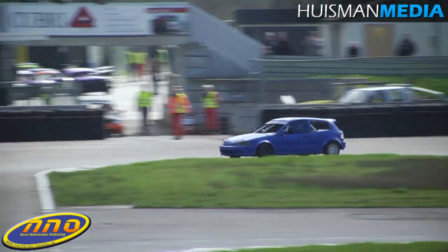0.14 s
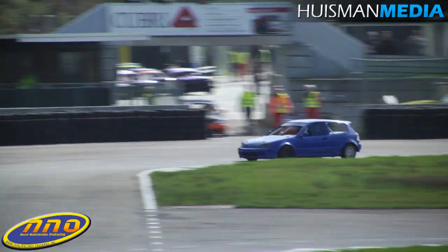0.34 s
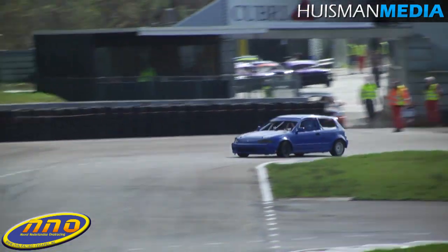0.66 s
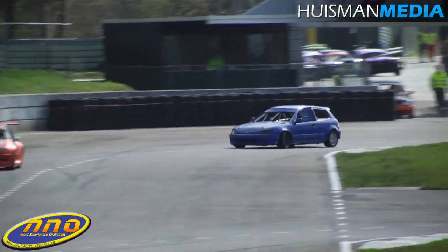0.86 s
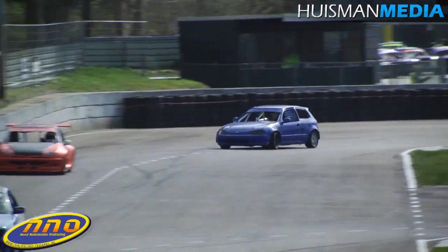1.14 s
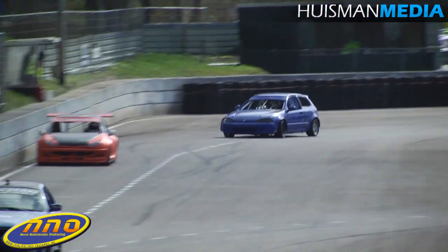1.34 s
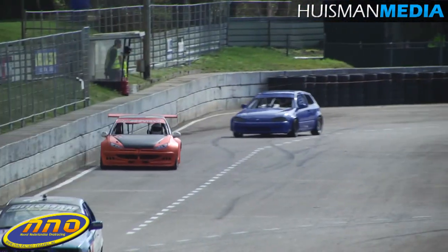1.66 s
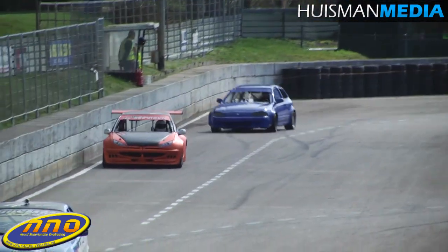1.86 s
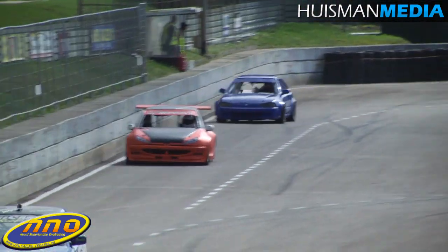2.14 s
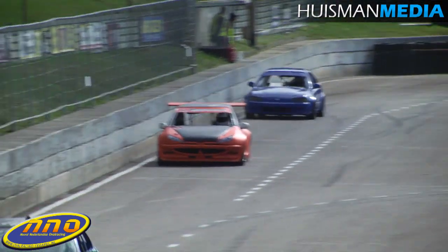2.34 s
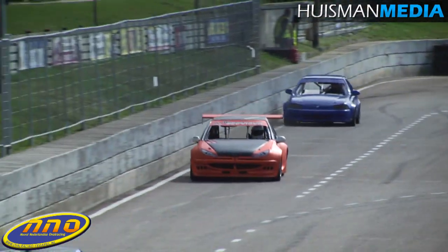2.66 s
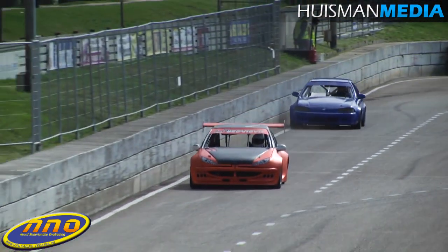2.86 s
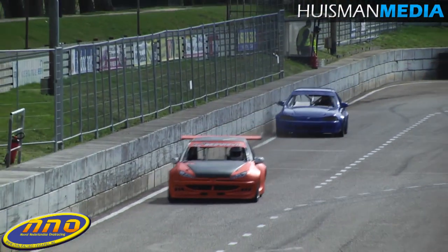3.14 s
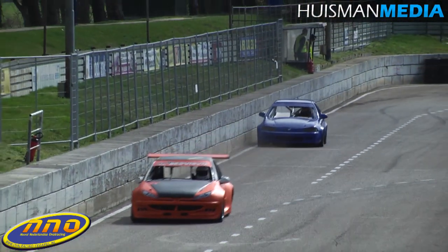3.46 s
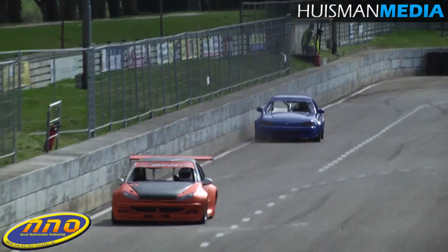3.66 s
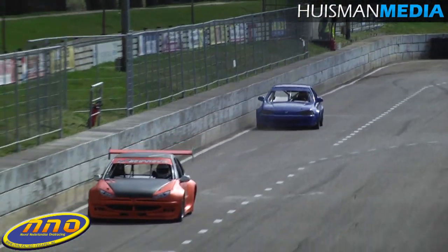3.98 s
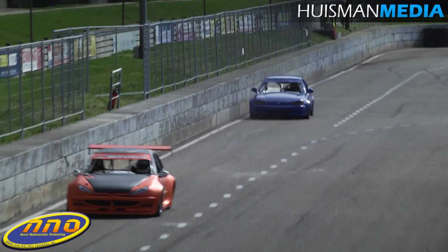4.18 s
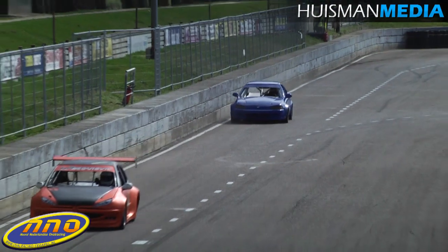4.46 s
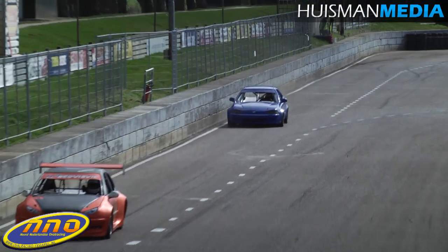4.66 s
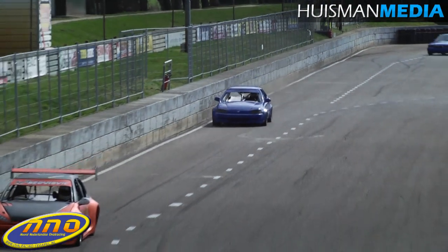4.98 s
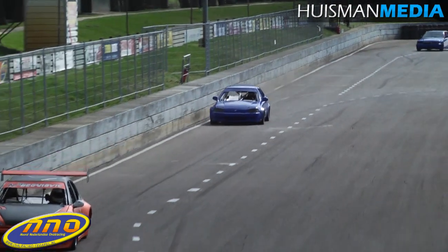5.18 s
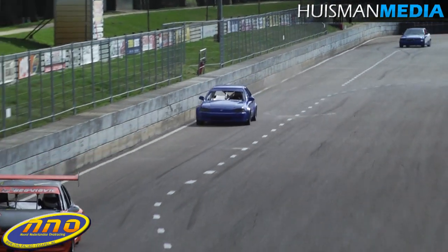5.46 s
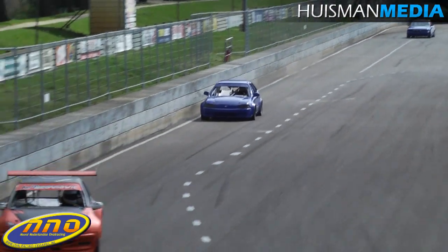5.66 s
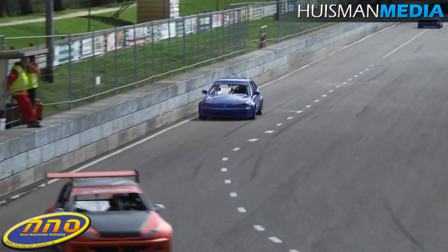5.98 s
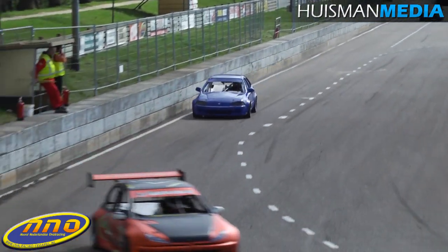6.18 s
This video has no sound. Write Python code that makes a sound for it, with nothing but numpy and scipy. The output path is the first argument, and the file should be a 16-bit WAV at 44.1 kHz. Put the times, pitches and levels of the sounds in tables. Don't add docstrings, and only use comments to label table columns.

```python
import sys
import numpy as np
from scipy import signal
from scipy.fft import rfft, irfft, next_fast_len
from scipy.io import wavfile
from scipy.ndimage import uniform_filter1d, map_coordinates

SR = 44100
rng = np.random.default_rng(int(sys.argv[2]) if len(sys.argv) > 2 else 0)


def linear_from_db(decibels):
    return 10 ** (np.asarray(decibels, float) / 20)


def wav_out(sig):
    wavfile.write(sys.argv[1], SR, np.round(np.clip(np.atleast_2d(sig).T, -1, 1) * 32767).astype(np.int16))


N = 278712

# (time [s], peak level [dB])
CREAKS = [(0.5486, -64), (0.583, -59), (0.9172, -61), (1.161, -68), (2.72, -59)]
# (frequency [Hz], level [dB])
CREAK_SPECTRUM = [(5500, -35), (7000, -1), (9500, 4), (11000, -32)]
# (frequency [Hz], level [dB])
SELF_NOISE_SPECTRUM = [(5000, -62), (7000, -4.5), (11000, 3.5), (15700, -1), (16000, -120)]

# (time [s], weight of traffic [dB], nearness of the closest tyres [dB])
TRAFFIC = [(0, 8.5, -8), (.3, -6, -2), (.5, -4.5, -5), (1.0, 1, -4), (1.4, 3, -0.5), (1.65, 5.5, -3),
           (2.05, 9.5, -0.5), (2.3, 5.5, 0), (2.6, 1, 8), (2.95, 0.5, -1), (3.2, -8, 3.5), (3.37, -1, -0.5),
           (3.5, -13.5, -5), (3.85, -14.5, 0.5), (4.05, -9, 0), (4.25, -12.5, -1.5), (4.65, -7, 3),
           (4.93, 1, 12), (5.3, 13, 9), (5.45, 3, 10.5), (5.85, 6, 12.5), (6.05, -4.5, 8.5)]
NOISE_FOLLOWS = {"rumble": (-39, 0.82, .01), "roar": (-31.5, 0.3, 0.12), "tyres": (-37, 0.2, 0.48),
                 "hiss": (-63, .01, 0.99)}
# (frequency [Hz], level [dB])
RUMBLE_SPECTRUM = [(12, -39.5), (20, -7.5), (92, 7.5), (146, -3.5), (170, -13.5), (220, -25), (370, -120)]
ROAR_SPECTRUM = [(71, -42), (120, -12), (144, -10.5), (259, 1), (350, -4.5), (522, -5), (628, -13),
                 (829, -7), (1400, -29.5), (1820, -51), (3080, -120)]
TYRE_SPECTRUM = [(590, -38.5), (1000, -9.5), (1160, 2.5), (1370, -5), (1530, -3.5), (2640, -6), (3020, -8),
                 (3480, -18), (4520, -39), (7660, -120)]
HISS_SPECTRUM = [(3300, -58), (3900, 0), (4300, -1), (5200, 1.5), (6200, -4), (7000, -14), (9000, -20),
                 (11500, -27.5), (15700, -43), (16000, -120)]
# (frequency [Hz], correlation [-1 to 1])
COHERENCE = [(50, .91), (420, .998), (3350, .93), (4250, -.45), (5500, .84), (6500, .8), (8500, -.1),
             (15000, -.1)]
# (frequency [Hz], left over right [dB])
PORT_BALANCE = [(3700, 0), (4450, 3.5), (5400, 0)]

# (frequency [Hz], t60 [s])
WALL_DECAY = [(100, 1), (500, 1), (2000, 0.47)]
# (time [s], gain [dB])
PATH_NULLS = [(0.436, -15.5), (3.122, -9.5), (3.193, -10), (3.274, -11.5), (3.41, 1), (3.48, 0.5),
              (3.58, -3), (3.683, -3), (3.77, -2), (4.11, -4), (4.207, -19.5), (5.71, -0.5), (5.785, -7),
              (5.965, -9.5), (6.03, -10)]

# (time [s], level [dB])
BACKFIRES = [
    (6.0463, -9.5),
    (6.0822, -8.5),
    (6.085, -8),
]
# (start [s], end [s], first pitch [Hz], last pitch [Hz], level [dB])
TYRE_SLIPS = [(2.65, 2.76, 1165, 1175, -34), (2.761, 2.82, 1120, 1105, -34), (3.065, 3.1, 814, 800, -31),
              (3.101, 3.19, 798, 808, -24), (3.191, 3.26, 842, 785, -22), (3.261, 3.31, 800, 860, -32),
              (3.325, 3.39, 835, 800, -23), (3.391, 3.42, 800, 815, -29), (3.421, 3.48, 815, 812, -35),
              (3.6, 3.86, 865, 888, -38), (3.9, 3.96, 790, 805, -35), (4.02, 4.1, 845, 825, -35)]

# (start [s], end [s], first pitch [Hz], last pitch
# [Hz], level [dB])
ENGINE_WHINES = [(4.82, 5.1, 1960, 1640, -39.5), (4.86, 5.02, 2700, 2580, -43),
                 (4.99, 5.16, 2630, 2420, -39.5), (5.12, 5.28, 2425, 2395, -36.5),
                 (5.03, 5.22, 2420, 2300, -42), (5.17, 5.3, 2310, 2290, -41), (5.27, 5.4, 2290, 2210, -41),
                 (5.48, 5.58, 2120, 2070, -45), (5.28, 5.44, 2700, 2600, -43), (5.0, 5.22, 1870, 1820, -41),
                 (5.03, 5.22, 1480, 1410, -40), (5.15, 5.38, 1550, 1590, -44), (5.24, 5.36, 1700, 1710, -40),
                 (5.52, 5.96, 1890, 2000, -40), (5.52, 5.96, 1077, 1140, -42), (5.52, 5.96, 1606, 1700, -46)]
# (start [s], end [s], first pitch [Hz], last
# pitch [Hz], level [dB])
GAP_CARS = [(.87, 1.0, 296, 262, -29), (.99, 1.42, 256, 267, -26), (1.5, 1.95, 252, 264, -26.5),
            (1.04, 1.42, 206, 194, -25), (.3, .52, 405, 425, -36), (.42, .5, 860, 860, -35),
            (2.62, 2.85, 200, 196, -31), (2.75, 2.92, 410, 410, -33), (2.45, 2.72, 530, 570, -36),
            (1.85, 2.3, 1040, 1075, -40), (5.98, 6.4, 100, 90, -33), (1.92, 2.08, 178, 182, -30),
            (5.55, 5.63, 280, 290, -25), (5.38, 5.56, 210, 255, -26), (1.39, 1.6, 213, 204, -25.5),
            (1.86, 1.98, 1175, 1190, -37), (1.6, 1.8, 198, 180, -27.5), (1.12, 1.48, 133, 140, -33)]

# (time [s], pitch [Hz])
SIX_HIGH_PITCH = [(0.0, 57.9), (0.2, 59.7), (0.36, 60.7), (0.46, 61.5)]
SIX_SHIFT_PITCH = [(.6, 172.2), (.68, 174.6), (.73, 166.3), (.78, 150.7), (.84, 141.6), (.93, 129.8),
                   (1.1, 134.5), (2.22, 153.0), (2.36, 148.4)]
FAR_FOUR_PITCH = [(0, 175.7), (.2, 178.3), (.5, 190.7), (.7, 202.5), (.95, 221.8), (1.45, 239.7)]
LEAVING_PITCH = [(0, 497), (.12, 515)]
CRUISER_PITCH = [(1.62, 287.2), (1.9, 294.0), (2.2, 291.7), (2.3, 294.5), (2.5, 289.0), (2.8, 281.8),
                 (3.05, 283.0)]
LEADER_PULL_PITCH = [(1.6, 200.2), (1.8, 207.7), (2.2, 229.2), (2.4, 235.6), (2.55, 246.3), (3.2, 275.9),
                     (3.8, 296.3), (4.05, 303.1)]
LEADER_COAST_PITCH = [(4.17, 300.7), (4.3, 283.5), (4.4, 284.2), (4.6, 265.0), (5.0, 221.6), (5.1, 204.6),
                      (5.2, 201.7), (5.36, 187.6)]
BRAKER_SLOWS_PITCH = [(2.6, 99.7), (2.8, 101.5), (3.15, 114.1), (3.4, 98.6), (3.95, 74.7), (4.08, 84.6),
                      (4.2, 117.8), (4.9, 56.9), (5.15, 56.0)]
BRAKER_GOES_PITCH = [(5.25, 69.9), (5.35, 99.4), (5.42, 126), (5.5, 160), (5.6, 192.7), (5.68, 193.5),
                     (5.8, 176.4), (5.88, 184), (5.97, 195.0), (6.1, 195.2), (6.32, 177.4)]
CHASER_PITCH = [(4.25, 233.2), (4.6, 245.2), (4.8, 248.2), (5.0, 258.2), (5.5, 267.5), (5.7, 277.2),
                (6.05, 287.7), (6.1, 286), (6.15, 277.0), (6.32, 269)]

# (time [s], leading order level [dB], other orders level [dB])
SIX_HIGH_THROTTLE = [(0, -18, -40), (0.04, -19, -41), (0.08, -15.5, -40), (0.14, -21, -37),
                     (0.2, -22, -34.5), (0.3, -22, -34.5), (0.36, -23, -36), (0.41, -28, -40),
                     (0.44, -44, -50)]
FAR_FOUR_THROTTLE = [(0, -29, -42), (0.121, -27, -46.5), (.43, -26, -42), (.49, -23.5, -37.5),
                     (.62, -22.5, -38.5), (.85, -26.5, -34.5), (.92, -33.5, -34), (1.21, -41.5, -36.5),
                     (1.45, -30.5, -44)]
SIX_CLUTCH_THROTTLE = [(.6, -47.5, -63), (.62, -24.5, -49.5), (.64, -15, -38.5), (.68, -14, -40),
                       (.731, -14.5, -47), (.769, -36.5, -35.5), (.81, -20, -33), (0.851, -22.5, -32),
                       (.88, -39, -33)]
SIX_PULL_THROTTLE = [(.95, -30, -33), (1.05, -30, -31), (1.3, -29, -31), (1.55, -29, -30), (1.75, -33, -31),
                     (2.0, -32, -30), (2.12, -30, -30), (2.22, -32, -32), (2.29, -28, -44),
                     (2.359, -30, -50)]
LEADER_PULL_THROTTLE = [(1.6, -32.5, -46.5), (1.93, -25.5, -35.5), (2.0, -25, -29), (2.07, -26, -36),
                        (2.12, -25, -22), (2.19, -22.5, -24.5), (2.281, -23.5, -32.5), (2.38, -17.5, -29.5),
                        (2.45, -24, -26), (2.519, -15.5, -26.5), (2.62, -15, -33.5), (2.7, -18, -36.5),
                        (2.735, -16.5, -23.5), (2.79, -16.5, -29.5), (2.87, -16, -38), (2.99, -17, -49),
                        (3.07, -14, -47), (3.4, -15.5, -49), (3.6, -13.5, -54), (4.13, -13.5, -54.5)]
LEADER_COAST_THROTTLE = [(4.2, -22.5, -49), (4.25, -19.5, -55), (4.33, -31.5, -48), (4.45, -31.5, -53.5),
                         (4.6, -23.5, -56), (4.65, -34, -47.5), (4.71, -22, -37.5), (4.82, -20.5, -46),
                         (4.9, -23, -38), (4.95, -19.5, -22), (5.05, -21.5, -32), (5.15, -25.5, -31.5),
                         (5.25, -24.5, -29.5), (5.36, -28.5, -37.5)]
BRAKER_SLOWS_THROTTLE = [(2.6, -58.5, -46), (2.72, -41, -47.5), (3.34, -34.5, -44), (3.6, -47.5, -34),
                         (3.841, -41, -53), (4.0, -52.5, -57), (4.21, -33.5, -25.5), (4.71, -36.5, -49.5),
                         (5.2, -44.5, -48.5)]
BRAKER_GOES_THROTTLE = [(5.27, -29, -40), (5.33, -18.5, -21.5), (5.38, -22.5, -22.5), (5.45, -38, -30.5),
                        (5.5, -40, -18.5), (5.55, -21, -23), (5.61, -16.5, -28), (5.69, -23.5, -33.5),
                        (5.75, -24.5, -27.5), (5.85, -34.5, -32.5), (5.9, -20, -38.5), (6.01, -21, -40.5),
                        (6.06, -27.5, -36.5), (6.17, -29.5, -35), (6.32, -30.5, -34)]
CHASER_NEARS_THROTTLE = [(4.25, -37.5, -40.5), (4.561, -29, -35.5), (4.79, -32, -33), (4.861, -42.5, -38.5),
                         (4.94, -29, -33.5), (5.25, -25, -32.5), (5.32, -21, -53.5), (5.4, -47, -53.5)]
CHASER_PULL_THROTTLE = [(5.48, -22, -35), (5.55, -30, -42), (5.71, -18, -45.5), (5.78, -16, -45),
                        (5.94, -17.5, -31.5), (6.01, -15, -50.5), (6.09, -18, -27.5), (6.17, -21.5, -50.5),
                        (6.32, -18.5, -52.5)]

# (time [s], level [dB])
HOWL_LEVEL = [(0, -39), (.07, -38), (.15, -40.5), (.25, -43), (.36, -42.5), (.44, -47)]
BARK_LEVEL = [(.61, -55), (.635, -35), (.68, -35), (.72, -35), (.76, -39), (.79, -55)]
LEAVING_LEVEL = [(0, -30), (.075, -30), (.12, -48)]
CRUISER_LEVEL = [(1.62, -47.5), (1.72, -31), (1.85, -29.5), (1.902, -28.5), (2.0, -18.5), (2.051, -24.5),
                 (2.1, -22.5), (2.16, -22), (2.24, -20.5), (2.299, -22), (2.38, -17.5), (2.46, -21.5),
                 (2.55, -38), (2.7, -26), (3.05, -44)]

# (multiple of pitch [ratio], level [dB])
SIX_HIGH_SERIES = [(4, 2), (7, -4), (9, -5), (12, 0), (13, -2), (14, 2), (15, -2), (16, -3), (18, -8),
                   (20, -10)]
HOWL_SERIES = [(24, -9), (25, -8), (27, -1), (28, -10), (29, -11), (30, -11), (38, -10), (42, -12)]
SIX_SHIFT_SERIES = [(3, 3), (4, 3), (5, 0), (6, 0), (7, -5), (8, -11), (9, -12), (10, -19), (11, -14),
                    (12, -19), (13, -15), (15, -16), (17, -20)]
BARK_SERIES = [(4.7, -4), (5.4, -1)]
FOUR_SERIES = [(.5, -18), (.75, -15), (1.25, -16), (1.5, -19), (1.75, -20), (2, 0), (3, -8)]
LEADER_SERIES = [(.75, -22), (1.25, -21), (1.5, -27), (1.75, -25), (2, 0), (3, -14)]
BRAKER_SERIES = [(.5, -15), (2, 0), (3, -10)]

# (frequency [Hz], level [dB])
TAILPIPE_RESPONSE = [(450, -1), (525, -6), (600, -3), (720, 0), (820, 2.5), (920, -1), (1000, -12),
                     (1080, -8), (1250, -1), (1400, -5), (1520, -1)]
RASP_SPECTRUM = [(400, -26.5), (700, -5), (900, 3), (1200, 2), (2000, -10.5), (3300, -19), (4000, -56.5)]


def unit(x):
    return x / np.sqrt(np.mean(x ** 2) + 1e-20)


def along(points, hz):
    f, value = np.transpose(points)
    return np.interp(np.log(hz + 1), np.log(f + 1), value)


def curves(rows):
    s, *columns = np.transpose(rows)
    span = np.arange(int(s[0] * SR), min(int(s[-1] * SR), N))
    return span, [np.interp(span / SR, s, column) for column in columns]


def wobble(rate, size):
    knots = rng.standard_normal(int(N * rate / SR) + 4)
    return map_coordinates(knots, [np.arange(size) * rate / SR], order=1)


def fade(span, seconds):
    still_sounding = span[-1] > N - SR // 100
    end = span[-1] + (0.01 * SR if still_sounding else 0)
    return np.clip(np.minimum(span - span[0], end - span) / (seconds * SR), 0, 1)


def swell(start, end, first_hz, last_hz, db):
    edge_db = db - 10.5
    full = [(start + share * (end - start), db) for share in (0.25, 0.65)]
    return [(start, first_hz), (end, last_hz)], [(start, edge_db), *full, (end, edge_db)]


def filtered(x, response):
    m = next_fast_len(N + 8192)
    return irfft(rfft(x, m) * response(np.fft.rfftfreq(m, 1 / SR)), m)[..., :N]


def rush(spectrum, patchy_db, gate=1):
    z = signal.stft(rng.standard_normal((2, N + 512)), nperseg=512)[2]
    field = uniform_filter1d(rng.standard_normal(z.shape[1:]), 6, 0)
    field = uniform_filter1d(field, 10, 1)
    pair = gate * signal.istft(z * linear_from_db(patchy_db * unit(field)), nperseg=512)[1][:, :N]

    def response(hz):
        angle = np.arccos(np.clip(along(COHERENCE, hz), -1, 1)) / 2
        return linear_from_db(along(spectrum, hz)) * [np.cos(angle), np.sin(angle)]

    mid, side = filtered(pair, response)
    return unit(np.array([mid + side, mid - side]))


def electronics(cars):
    power = uniform_filter1d(cars[0] ** 2, int(0.4 * SR))
    loud_db = 10 * np.log10(abs(power) + 1e-9)
    return linear_from_db(-81 - 0.5 * (loud_db - loud_db.mean())) * rush(SELF_NOISE_SPECTRUM, patchy_db=1)


def creaks():
    out, t = np.zeros((2, N)), np.arange(SR // 20) / SR
    t60_s = 0.03
    for s, db in CREAKS:
        burst = linear_from_db(db + 3 - 60 * t / t60_s) * rng.standard_normal((2, len(t)))
        out[:, round(s * SR):][:, :len(t)] += burst
    return filtered(out, lambda hz: linear_from_db(along(CREAK_SPECTRUM, hz)))


def track_noise():
    weight, near = [np.pad(c, (0, N - len(c)), "edge") for c in curves(TRAFFIC)[1]]
    levels = [mean_db + a * weight + b * near for mean_db, a, b in NOISE_FOLLOWS.values()]
    rumble_db, roar_db, tyres_db, hiss_db = levels
    surge = wobble(9, N)
    firing = linear_from_db(1.2 * wobble(270, N))
    rumble = linear_from_db(rumble_db + 1.5 * wobble(7, N)) * rush(RUMBLE_SPECTRUM, patchy_db=0.8)
    roar = linear_from_db(roar_db + 5 + 0.5 * surge) * rush(ROAR_SPECTRUM, patchy_db=1, gate=firing)
    tyres = linear_from_db(tyres_db + 0.5 + surge) * rush(TYRE_SPECTRUM, patchy_db=0.5, gate=firing)
    hiss = linear_from_db(hiss_db + 2.5 + 0.6 * surge) * rush(HISS_SPECTRUM, patchy_db=1.5, gate=firing)
    return rumble + roar + tyres + hiss


def walls(x):
    hz, t, z = signal.stft(rng.standard_normal((2, SR)), SR, nperseg=256)
    decay = linear_from_db(-60 * t / along(WALL_DECAY, hz)[:, None])
    mid, side = signal.istft(z * decay, SR, nperseg=256)[1]
    tail = np.array([mid + 0.046 * side, mid - 0.054 * side]) / np.linalg.norm(mid)
    delayed = np.pad(x, (1500, 0))[None]
    return signal.fftconvolve(delayed, tail, axes=1)[:, :N]


def interference():
    t = np.arange(N) / SR
    return linear_from_db(sum(db * np.exp(-((t - s) / 0.016) ** 2) for s, db in PATH_NULLS))


def backfire():
    out, t = np.zeros(N + SR), np.arange(SR // 10) / SR
    pop_s, puff_t60_s, thump_t60_s, thump_hz, top_hz = 0.00043, 0.034, 0.097, 125, 2600
    for s, db in BACKFIRES:
        pop = -(t / pop_s) * (2 - t / pop_s) * np.exp(1 - t / pop_s)
        gas = uniform_filter1d(rng.standard_normal(len(t)), size=24) * 5
        puff = linear_from_db(-18 - 60 * t / puff_t60_s) * gas
        thump = linear_from_db(-14 - 60 * t / thump_t60_s) * np.sin(2 * np.pi * thump_hz * t)
        out[round(s * SR):][:len(t)] += linear_from_db(db) * (pop + puff + thump)
    return filtered(out[:N], lambda hz: 1 / (1 + 1j * hz / top_hz) ** 6)


def squeal():
    slips = [swell(*slip) for slip in TYRE_SLIPS]
    pitch, level = (sum(part, []) for part in zip(*slips))
    span, (db,) = curves(level)
    hz = np.interp(span / SR, *np.transpose(pitch))
    phase = 2 * np.pi * np.cumsum(hz + 9 * wobble(60, len(span))) / SR
    tone = np.sin(phase) + linear_from_db(-15) * np.sin(2 * phase)
    out = np.zeros(N)
    out[span] = linear_from_db(db + 1 + wobble(57, len(span))) * tone * fade(span, 0.015)
    return out


def exhaust(pitch, throttle, lead, orders, rough, rasp_db=None):
    span, levels = curves(throttle)
    size = len(span)
    lead_db, rest_db = levels[0], levels[-1]
    hz = np.interp(span / SR, *np.transpose(pitch))
    phase = 2 * np.pi * np.cumsum(hz) / SR + rough * wobble(30, size) / lead
    voice = linear_from_db(lead_db + 5.1 * rough * wobble(25, size)) * np.sin(lead * phase)
    for multiple, db in orders:
        shake_db = 7 * rough * wobble(18, size)
        base_db = rest_db if multiple >= 1.9 else lead_db
        voice += linear_from_db(base_db + db + shake_db) * np.sin(multiple * phase + rng.normal(0, 0.9))
    out = np.zeros(N)
    out[span] = np.sqrt(2) * voice * fade(span, 0.014)
    if rasp_db is not None:
        noise = rng.standard_normal(N)
        gas = unit(filtered(noise, lambda hz: linear_from_db(along(RASP_SPECTRUM, hz))))[span]
        bursts = unit(gas * np.exp(2 * np.cos(phase)))
        out[span] += linear_from_db(rest_db + rasp_db) * bursts * fade(span, 0.013)
    return out


def engine_whines():
    return sum(exhaust(*swell(*whine), 1, [], rough=0.45) for whine in ENGINE_WHINES)


def glimpsed_cars():
    return sum(exhaust(*swell(*car), 1, [(2, -14)], rough=0.4) for car in GAP_CARS)


def shifting_six():
    throttle = SIX_CLUTCH_THROTTLE + SIX_PULL_THROTTLE
    engine = exhaust(SIX_SHIFT_PITCH, throttle, 2, SIX_SHIFT_SERIES, rough=0.14, rasp_db=-9)
    bark = exhaust(SIX_SHIFT_PITCH, BARK_LEVEL, 5, BARK_SERIES, rough=0.3)
    return filtered(engine, lambda hz: linear_from_db(along(TAILPIPE_RESPONSE, hz))) + bark


def engines():
    leader_pitch = LEADER_PULL_PITCH + LEADER_COAST_PITCH
    leader_throttle = LEADER_PULL_THROTTLE + LEADER_COAST_THROTTLE
    braker_pitch = BRAKER_SLOWS_PITCH + BRAKER_GOES_PITCH
    braker_throttle = BRAKER_SLOWS_THROTTLE + BRAKER_GOES_THROTTLE
    chaser_throttle = CHASER_NEARS_THROTTLE + CHASER_PULL_THROTTLE
    cars = engine_whines() + glimpsed_cars()
    cars += exhaust(SIX_HIGH_PITCH, SIX_HIGH_THROTTLE, 6, SIX_HIGH_SERIES, rough=0.18)
    cars += exhaust(SIX_HIGH_PITCH, HOWL_LEVEL, 26, HOWL_SERIES, rough=0.25)
    cars += exhaust(LEAVING_PITCH, LEAVING_LEVEL, 1, [], rough=0.2)
    cars += exhaust(FAR_FOUR_PITCH, FAR_FOUR_THROTTLE, 1, FOUR_SERIES, rough=0.2)
    cars += shifting_six()
    cars += exhaust(CRUISER_PITCH, CRUISER_LEVEL, 1, [(2, -21)], rough=0.15)
    cars += exhaust(leader_pitch, leader_throttle, 1, LEADER_SERIES, rough=0.12)
    cars += exhaust(braker_pitch, braker_throttle, 1, BRAKER_SERIES, rough=0.18)
    cars += exhaust(CHASER_PITCH, chaser_throttle, 1, FOUR_SERIES, rough=0.2)
    return cars


def scene():
    cars = engines()
    cars = cars + linear_from_db(-17) * walls(cars)
    cars = interference() * cars + squeal() + backfire()
    return electronics(cars) + creaks() + track_noise() + cars


def low_pass(x):
    return signal.sosfilt(signal.butter(12, 15719, fs=SR, output="sos"), x)


def record(dry):
    ports = filtered(dry, lambda hz: linear_from_db(np.outer([0.5, -0.5], along(PORT_BALANCE, hz))))
    return low_pass(ports)


dry = scene()
out = record(dry)
wav_out(out)
```